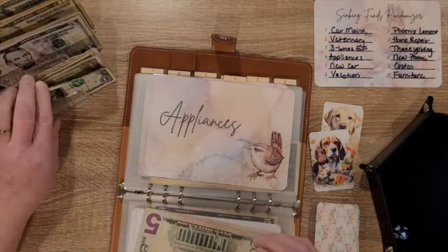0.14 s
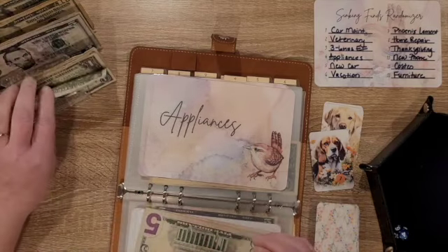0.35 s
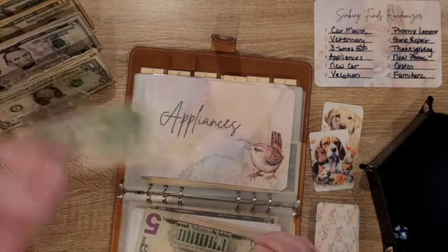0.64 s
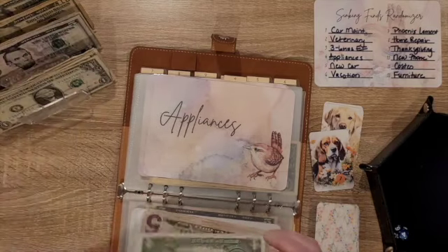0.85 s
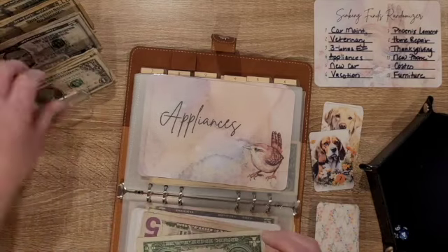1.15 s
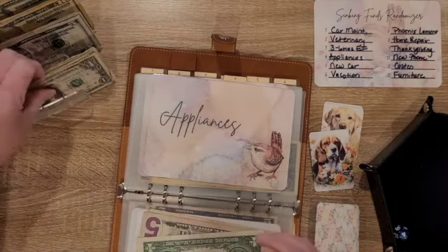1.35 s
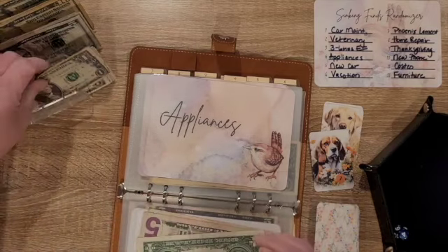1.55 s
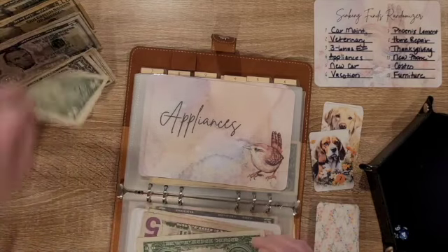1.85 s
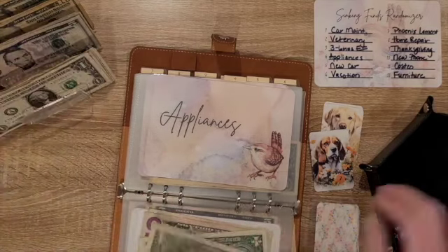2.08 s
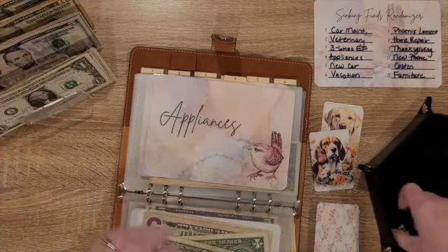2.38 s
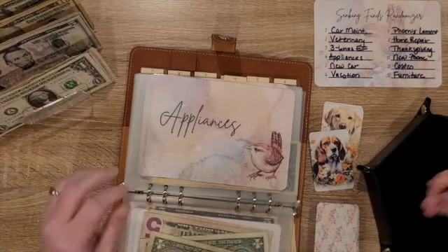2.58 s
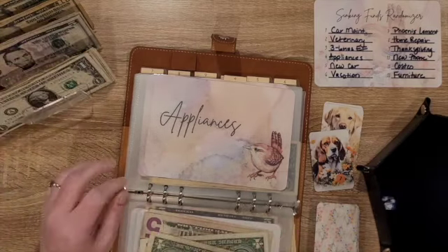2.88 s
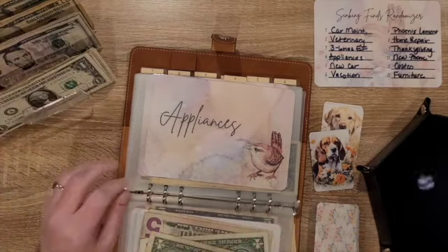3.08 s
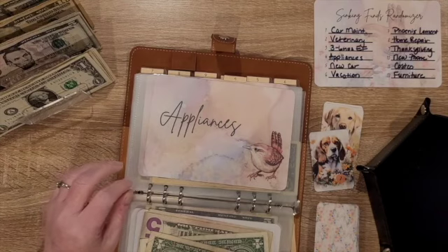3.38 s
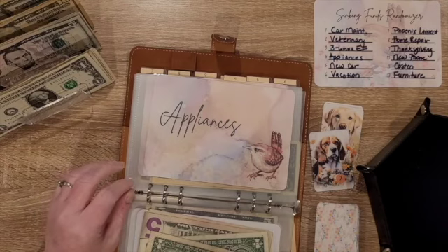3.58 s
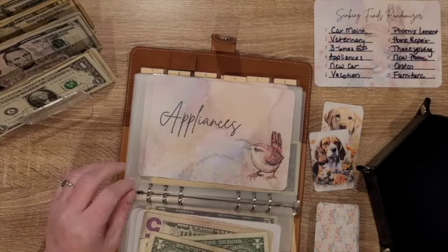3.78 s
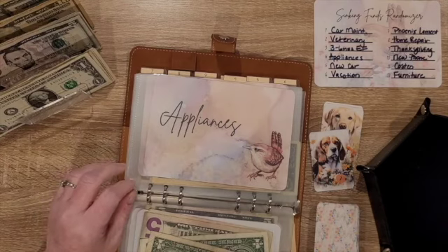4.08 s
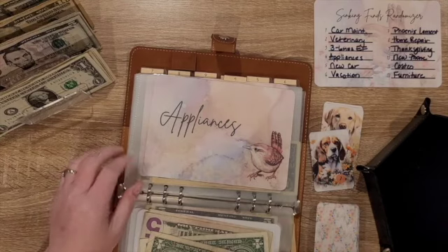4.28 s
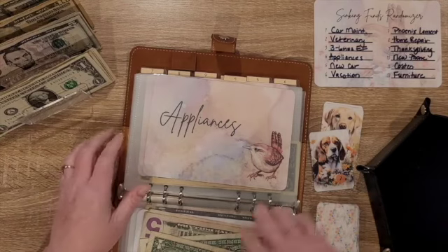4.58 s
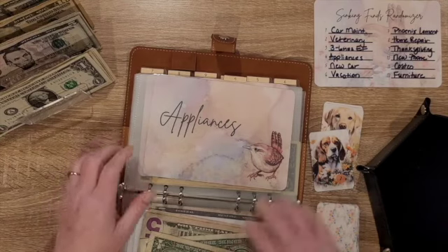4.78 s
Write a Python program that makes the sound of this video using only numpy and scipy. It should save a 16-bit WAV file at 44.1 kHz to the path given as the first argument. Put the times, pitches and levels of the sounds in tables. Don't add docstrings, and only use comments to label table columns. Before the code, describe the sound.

Close stereo microphones in a small, dry room catch banknotes being flicked and slid: two quick crackling flicks in the first second, softer sliding, then another sharp snap. A small hard object clacks on the wooden desk and bounces rapidly to rest. After a pause a hand bumps the desk dully with a little paper scrape. A distant fan hums low throughout.

```python
import sys
import numpy as np
from scipy import signal
from scipy.fft import rfft, irfft, next_fast_len
from scipy.io import wavfile
from scipy.ndimage import uniform_filter1d, map_coordinates

SR = 44100
rng = np.random.default_rng(int(sys.argv[2]) if len(sys.argv) > 2 else 0)


def dump_mix(stems):
    frames = np.atleast_2d(stems).T
    limited = np.clip(frames, -1, 1)
    pcm = np.round(limited * 32767).astype(np.int16)
    wavfile.write(sys.argv[1], SR, pcm)


def how_loud(loudness_db):
    steps = np.asarray(loudness_db, float) / 20
    return 10 ** steps


N = 217577

# (frequency [Hz], t60 [s])
ROOM_DECAY = [(250, 0.22), (1000, 0.12), (4000, 0.11), (12000, 0.088)]
# (frequency [Hz], likeness [-1 to 1])
ROOM_LIKENESS = [(60, 0.94), (180, 0.93), (550, 0.28), (1650, -0.25), (4970, -0.15), (15000, -0.0)]
PAPER_LIKENESS = [(300, 0.82), (700, 1), (1400, 0.21), (3100, 0), (7000, 0)]

# (frequency [Hz], width [Hz], level [dB])
MOTOR_LINES = [(58.93, 10.8, -55), (120.86, 9.9, -57.5), (160.54, 11, -63.5), (240.8, 50, -69.5),
               (1223, 1.8, -99)]
# (frequency [Hz], density [dB per Hz])
RUMBLE_COLOUR = [(15, -67), (25, -27.5), (35, -12), (48, -14), (70, 0), (92, -15), (123, -1.5),
                 (151, -18.5), (300, -19), (381, -31), (422, -27), (555, -41.5), (1140, -53), (1500, -69),
                 (1950, -89.5), (3300, -120)]
FAR_HISS_COLOUR = [(590, -37.5), (1000, -18), (1150, -6.5), (1340, -13), (1710, -10.5), (5760, -18.5),
                   (6630, -11.5), (7790, -20), (14400, -15), (16000, -22.5)]

# (time [s], boom level [dB], knock level [dB], clack level [dB], first swing [sign])
OBJECT_TAPS = [
    (2.8892, -49, -33, -38.5, 1),
    (2.9122, -25.5, -29, -21.5, -1),
    (2.9812, -27.5, -35, -49, 1),
    (3.0295, -34.5, -48, -74.5, -1),
    (3.063, -51, -59.5, -75.5, 1),
]
HAND_BUMP = [
    (4.6057, -24.5, -40, -75, -1),
]
# (frequency [Hz], level [dB], t60 [s], swing [sign])
OBJECT_PANEL = [(246.6, -1.5, 0.097, -0.86), (307, 2.5, 0.055, 1)]
HAND_PANEL = [(267, 0, .095, -1), (309, 0, .095, 1)]
OBJECT_KNOCK = [(441, 10.5, 0.017, 1), (590, -10.5, 0.041, 0.6), (767, -6, 0.032, 1)]
HAND_KNOCK = [(430, 4, .022, 1), (675, -12, .04, 1), (880, -11, .04, 1), (1120, -20, .03, 1),
              (1607, -24, .035, 1), (2070, -20, .035, 1), (3180, -26, .03, 1)]
CLACK_MODES = [(1110, 12, .011, 1), (985, -5, .04, 1), (1244, -10, .04, 1), (1421, -5, .025, 1),
               (1776, -21, .03, 1)]

# (time [s], peak level [dB], low part [dB re peak], high part [dB re peak], low pitch [Hz])
CREASE_SNAPS = [(0.0376, -69, -12, -5, 673), (0.1284, -67, -3, 2, 616), (0.3486, -73, -10, -15, 1100),
                (0.384, -76, 14, -11, 950), (0.4424, -48.5, 7.5, -11, 630), (0.4535, -47, -6, -10, 520),
                (0.4604, -53.5, 4, -10.5, 1030), (0.4721, -47, 0.5, 0.5, 940), (0.839, -67, 6, -6, 1840),
                (0.8616, -45, 4, -13, 780), (0.884, -49, -25, -19, 1000), (0.8956, -39.5, -15, -6.5, 940),
                (0.9084, -48, -19, -16, 1060), (0.9243, -43, -17, -10, 940), (1.224, -67, 0, -13, 1070),
                (1.8917, -49.5, -6.5, -16, 1070), (1.934, -62, 8, -15, 784), (2.036, -71, 9, -6, 767),
                (2.0857, -54.5, 14, -21, 2040), (2.101, -61, -9, -9, 1430), (2.1235, -57, -6, -12, 600),
                (2.1351, -31.5, -8.5, -16, 1120), (4.682, -69, -17, 4.5, 619)]
# (time [s], onset level [dB], low edge [Hz], high edge [Hz])
CREASE_CRACKS = [(.128, -63, 6000, 14000), (.4435, -47, 600, 14000), (.4525, -51, 6000, 12000),
                 (.4625, -53, 8000, 15000), (.474, -52, 9000, 15500), (.601, -50, 6000, 8500),
                 (.8615, -48, 600, 8000), (.8855, -45, 600, 4000), (.8985, -45, 7000, 14000),
                 (.908, -41, 1500, 8500), (.9235, -41, 2000, 16000), (2.0862, -51, 900, 4000),
                 (2.1235, -48, 1800, 4500), (2.1355, -43, 800, 16000)]

# (peak time [s], scrape level [dB], swell [s per 20 dB], fade [s per 20 dB], weight [dB])
FLICK_STROKES = [(.438, -72, .025, .01, -2), (.444, -54, .002, .04, 5), (.47, -66, .02, .04, 6),
                 (.53, -68, .08, .03, 0), (.558, -59, .03, .08, -3), (.578, -55, .05, .05, -4),
                 (.597, -52, .04, .014, -9), (.62, -74, .01, .1, -3), (.73, -82, .2, .04, -4),
                 (.852, -67, .05, .02, 0), (.864, -62, .012, .05, 10), (.888, -57, .03, .04, 9),
                 (.908, -50, .04, .04, 2), (.927, -55, .04, .017, -1), (.945, -70, .01, .065, -1),
                 (2.087, -72, .001, .05, 14), (2.104, -72, .012, .04, 17), (2.124, -63, .02, .03, 6),
                 (2.138, -58, .022, .05, 6), (2.16, -66, .02, .025, -3), (2.185, -78, .02, .16, -6)]
SLIDE_STROKES = [(.001, -74.5, .01, 0.0073, 18.5), (.04, -83, 0.018, 0.071, 11.5),
                 (.13, -73, 0.024, .025, -2), (.35, -86, .1, .05, 4), (1.228, -90, 0.025, 0.13, 17),
                 (1.29, -86, 0.11, 0.14, 8), (1.37, -84, 0.066, 0.11, 6), (1.41, -78, 0.087, 0.14, 2),
                 (1.5, -87.5, 0.27, .4, 4), (1.625, -74, 0.095, .2, -1), (1.67, -69.5, .08, 0.17, -5.5),
                 (1.702, -65, 0.083, 0.075, 3), (1.803, -63, 0.06, 0.089, -10.5),
                 (1.865, -63, 0.11, .06, -1.5), (1.93, -89, 0.098, 0.039, 22), (1.99, -84, 0.12, 0.17, 7),
                 (2.404, -75, 0.085, 0.1, -6), (2.51, -82, 0.045, 0.095, -1),
                 (4.608, -68.5, 0.0026, .03, 12.5), (4.632, -77.5, 0.08, .05, 3)]
BRUSH_STROKES = [
    (2.385, -91.5, .06, 0.091, 0),
    (4.684, -89, .012, 0.045, 0),
    (4.89, -88.5, 0.077, 0.12, 2),
    (4.935, -81.5, 0.06, .05, 2),
]
# (low edge [Hz], high edge [Hz])
PAPER_ZONES = [(4300, 10000), (450, 1600), (1600, 4300), (10000, 17000)]
# (scrape, flap, body, hiss [dB per dB])
ZONE_WEIGHT = (0.0085, 1.27, 0.95, -.12)
# (time [s], share [0-1])
TRAY_SHARE = [(0, 1), (.62, 0.52), (.8, 0.4), (1.1, 0), (1.3, 1), (1.6, 1), (1.8, 0.46), (1.9, 0.24),
              (4.9, 0.55)]
# (time [s], left minus right level [dB])
PAPER_PAN = [(0, -9), (.7, 0.5), (.9, 6), (1.9, 0.5), (2.1, 9), (2.4, 8), (4.9, 10)]


def unit(x):
    return x / np.sqrt(np.mean(x ** 2) + 1e-20)


def along(points, hz):
    f, v = np.transpose(points)
    return np.interp(np.log(hz + 1), np.log(f + 1), v)


def wobble(rate):
    knots = rng.standard_normal(int(N * rate / SR) + 4)
    return map_coordinates(knots, [np.arange(N) * rate / SR])


def filtered(x, response):
    m = next_fast_len(x.shape[-1] + 8192)
    spectrum = rfft(x, m) * response(np.fft.rfftfreq(m, 1 / SR))
    return irfft(spectrum, m)[..., :x.shape[-1]]


def resonance(hz, width_hz):
    return lambda f: (1j * f * width_hz / (hz * hz - f * f + 1j * f * width_hz)) ** 2


def band(low_hz, high_hz, order=7):
    def response(f):
        low_skirt = 1 + (low_hz / (f + 1)) ** (2 * order)
        high_skirt = 1 + (f / high_hz) ** (2 * order)
        return 1 / np.sqrt(low_skirt * high_skirt)
    return response


def spaced(pair, alike):
    def mid_side(hz):
        turn = np.arccos(np.clip(along(alike, hz), -1, 1)) / 2
        return np.array([np.cos(turn), np.sin(turn)])
    mid, side = filtered(pair, mid_side)
    return np.array([mid + side, mid - side])


def fading_noise(t, t60):
    return rng.standard_normal((2, len(t))) * how_loud(-60 * t / t60)


def ring(modes, t, scatter_db):
    total = 0
    for hz, db, t60, sign in modes:
        strength_db = db + rng.normal(0, scatter_db, (2, 1))
        total = total + sign * how_loud(strength_db - 60 * t / t60) * np.sin(2 * np.pi * hz * t)
    return total


def room(x):
    hz, t, z = signal.stft(rng.standard_normal((2, SR // 3)), SR, nperseg=256)
    fading = z * how_loud(-60 * t / along(ROOM_DECAY, hz)[:, None])
    tail = signal.istft(fading, SR, nperseg=256)[1]
    tail = spaced(tail / np.linalg.norm(tail[0]), ROOM_LIKENESS)
    delayed = np.pad(x, ((0, 0), (150, 0)))
    return signal.fftconvolve(delayed, tail, axes=1)[:, :x.shape[1]]


def fan():
    t = np.arange(N) / SR
    whine_hz, whine_db = 1120, -89
    whine_level = how_loud(whine_db + 3 + 1.2 * np.array([wobble(6), wobble(6)]))
    total = whine_level * np.sin(2 * np.pi * whine_hz * t + .4 * wobble(4))
    for hz, width_hz, db in MOTOR_LINES:
        line = filtered(rng.standard_normal((2, N)), resonance(hz, width_hz))
        total += how_loud(db) * unit(line)
    for colour, db in ((RUMBLE_COLOUR, -51), (FAR_HISS_COLOUR, -83)):
        rush = filtered(rng.standard_normal((2, N)), lambda hz: how_loud(along(colour, hz)))
        total += how_loud(db + 0.47 * wobble(3)) * unit(rush)
    return spaced(total, ROOM_LIKENESS)


def desk_hits(rows, panel, edge, rise, tick_t60):
    out, t = np.zeros((2, N + SR)), np.arange(SR // 3) / SR
    late = (t - np.array([[0], [.0002]])).clip(0)
    swell = 1 - np.exp(-late / rise)
    clack_swell = 1 - np.exp(-late / 0.00087)
    for s, boom_db, knock_db, clack_db, sign in rows:
        boom = how_loud(boom_db) * ring(panel, late, scatter_db=3.5) * swell
        knock = how_loud(knock_db) * ring(edge, late, scatter_db=3.5) * swell
        rattle = how_loud(4) * filtered(fading_noise(t, 0.069), lambda hz: resonance(850, 1700)(hz) ** 3)
        clack = ring(CLACK_MODES, late, scatter_db=0.5) + rattle
        clack = how_loud(clack_db - 3.5) * clack * how_loud([[-1.5], [1.5]]) * clack_swell
        tick = how_loud(knock_db - 31.5) * filtered(fading_noise(t, tick_t60), resonance(5000, 11000))
        hard = knock + clack + tick
        echo = room(how_loud(-21.0) * boom + how_loud(-6) * hard)
        out[:, round(s * SR):][:, :len(t)] += np.sign(sign) * (boom + hard + echo)
    return out[:, :N]


def snaps():
    out, t = np.zeros((2, N + 6000)), np.arange(5000) / SR
    for s, db, low_db, high_db, low_hz in CREASE_SNAPS:
        noise = spaced(rng.standard_normal((2, len(t))), PAPER_LIKENESS)
        low = how_loud(low_db + 12.5) * filtered(noise * how_loud(-60 * t / 0.033), resonance(low_hz, 680))
        middle = filtered(noise * how_loud(-60 * t / .009), resonance(3500, 5500))
        high = how_loud(high_db - 3) * filtered(noise * how_loud(-60 * t / .007), resonance(10500, 11000))
        thud = how_loud(-11) * ring(OBJECT_PANEL, t, scatter_db=3.5)
        out[:, round((s + .001) * SR):][:, :len(t)] += how_loud(db) * (low + middle + high + thud)
    return out[:, :N]


def cracks():
    out, t = np.zeros((2, N)), np.arange(1500) / SR
    for s, db, low_hz, high_hz in CREASE_CRACKS:
        noise = spaced(rng.standard_normal((2, len(t))), PAPER_LIKENESS)
        noise = unit(filtered(noise, band(low_hz, high_hz, order=2)))
        out[:, round(s * SR):][:, :len(t)] += how_loud(db - 60 * t / .012) * noise
    return out


def fibres(density, spread_db, life, patchy_db):
    struck = rng.random(N) < density * how_loud(6 * wobble(60)) / SR
    hits = struck * how_loud(spread_db * rng.exponential(1, N).clip(0, 3))
    grains = signal.fftconvolve(hits, np.exp(-np.arange(400) / SR / life))[:N]
    z = signal.stft((1 + .5 * grains) * rng.standard_normal((2, N)), nperseg=128)[2]
    patches = uniform_filter1d(rng.standard_normal(z.shape[1:]), size=3, axis=0)
    patches = uniform_filter1d(patches, size=7, axis=1)
    scrape = signal.istft(z * how_loud(patchy_db * unit(patches)), nperseg=128)[1][:, :N]
    return spaced(scrape, PAPER_LIKENESS)


def strokes():
    t, power = np.arange(N) / SR, np.zeros((4, N))
    scrape = fibres(density=700, spread_db=1.5, life=.0008, patchy_db=3)
    tray = how_loud(6) * filtered(scrape, lambda hz: abs(resonance(7400, 1300)(hz)))
    scrape = scrape + np.interp(t, *np.transpose(TRAY_SHARE)).clip(0, 1) * tray
    zones = [unit(filtered(scrape, band(low_hz, high_hz))) for low_hz, high_hz in PAPER_ZONES]
    pan_db = np.interp(t, *np.transpose(PAPER_PAN))
    zones[3] = zones[3] * how_loud([pan_db / 2, -pan_db / 2])
    # flap, body, hiss [dB re scrape]
    kinds = ((FLICK_STROKES, (-3, 0.5, -5.5)),
             (SLIDE_STROKES, (-11.5, -11.5, -10)),
             (BRUSH_STROKES, (-2, -2, 11.5)))
    for rows, colour_db in kinds:
        for s, db, swell, fade, weight_db in rows:
            start = max(round((s - 2 * swell) * SR), 0)
            on = slice(start, round((s + 2 * fade) * SR))
            shape = how_loud(db - 20 * np.maximum((s - t[on]) / swell, (t[on] - s) / fade))
            zone_db = np.r_[0, colour_db] + weight_db * np.array(ZONE_WEIGHT)
            power[:, on] += np.outer(how_loud(zone_db), shape) ** 2
    return sum(level * zone for level, zone in zip(np.sqrt(power), zones))


def scene():
    air = fan()
    object_taps = desk_hits(OBJECT_TAPS, OBJECT_PANEL, OBJECT_KNOCK, rise=0.00074, tick_t60=0.033)
    hand_bump = desk_hits(HAND_BUMP, HAND_PANEL, HAND_KNOCK, rise=.0012, tick_t60=.03)
    paper = strokes() + snaps() + cracks()
    return air + object_taps + hand_bump + paper + how_loud(-11) * room(paper)


def roll_off(x):
    return signal.sosfilt(signal.butter(12, 16360, fs=SR, output="sos"), x)


def record(dry):
    heard = filtered(dry, lambda hz: (hz < 15850) / np.sqrt(1 + (44 / (hz + 1)) ** 7))
    return roll_off(heard)


dry = scene()
out = record(dry)
dump_mix(out)
```